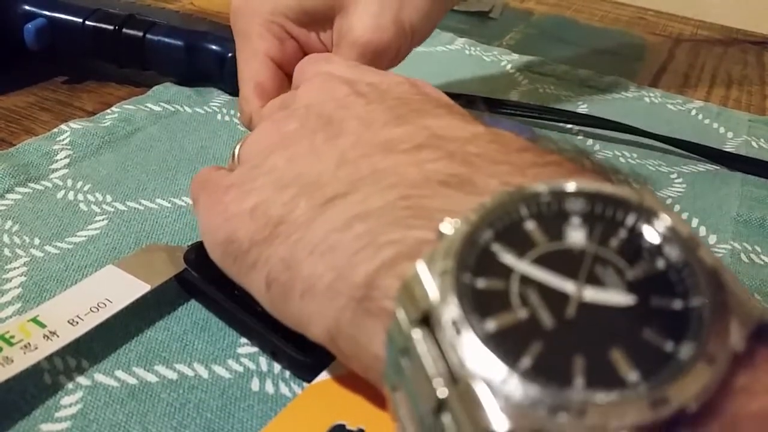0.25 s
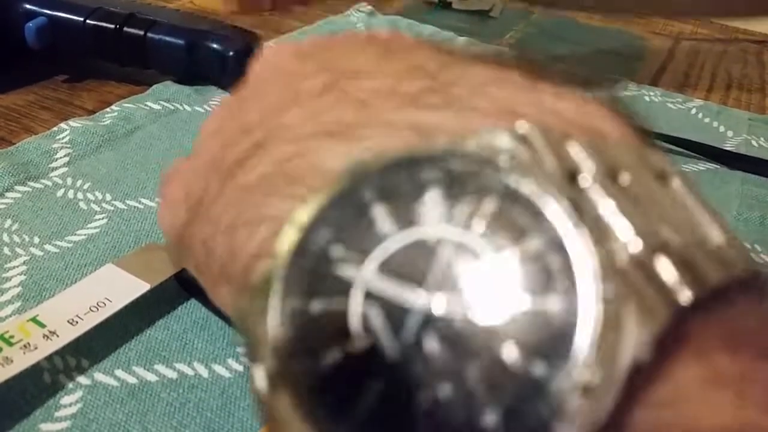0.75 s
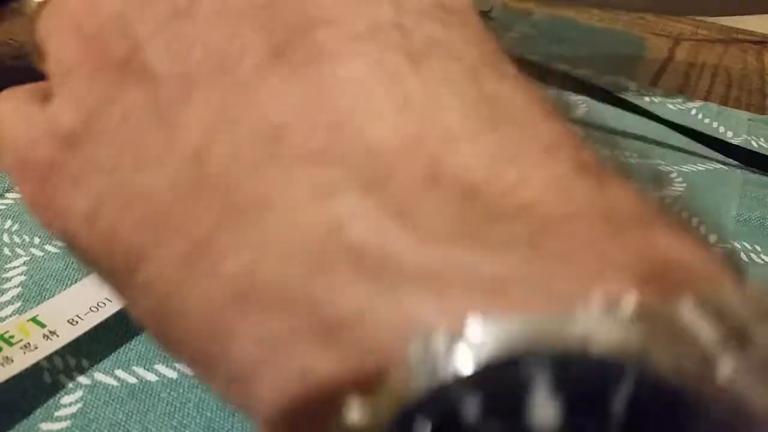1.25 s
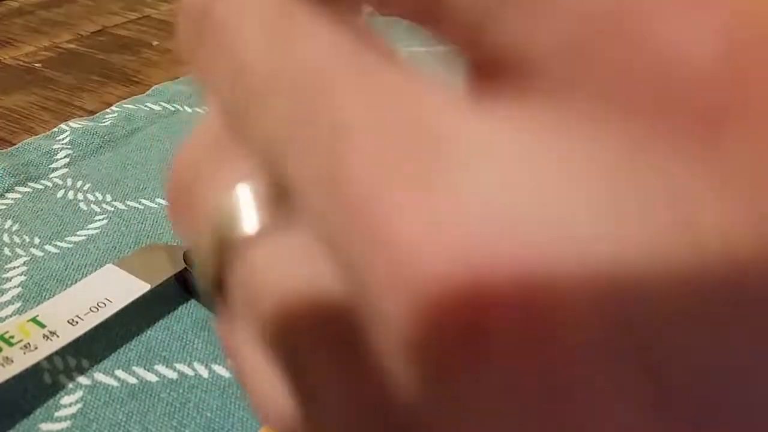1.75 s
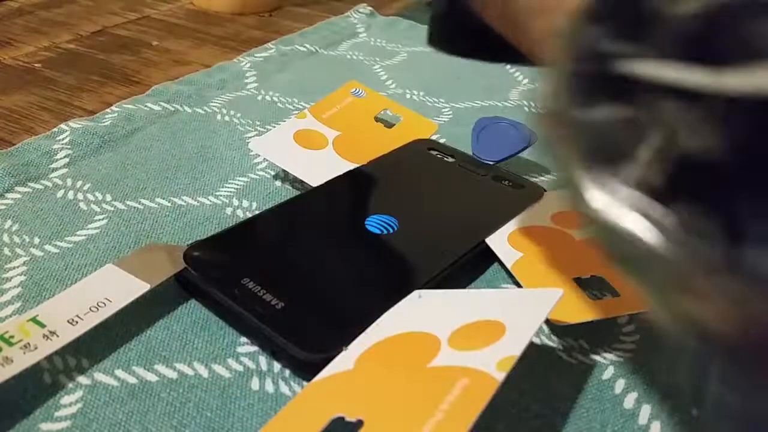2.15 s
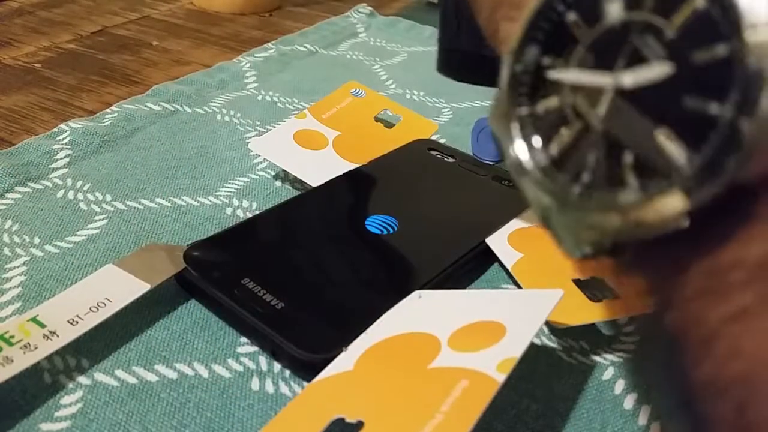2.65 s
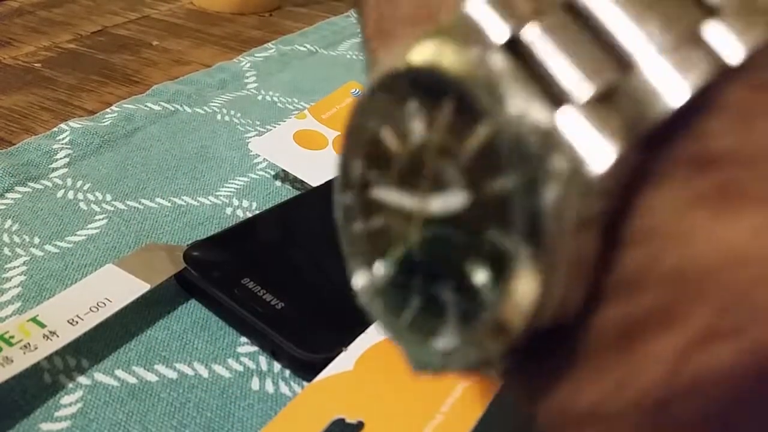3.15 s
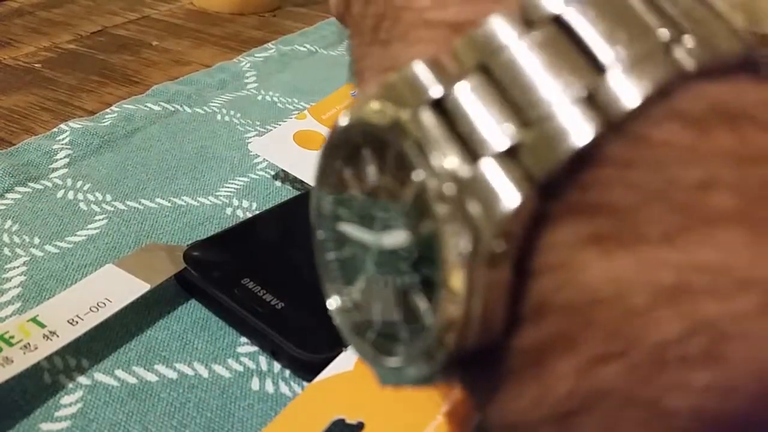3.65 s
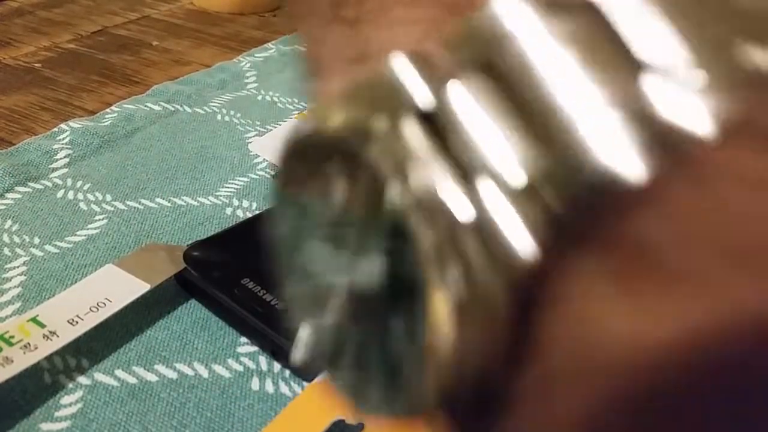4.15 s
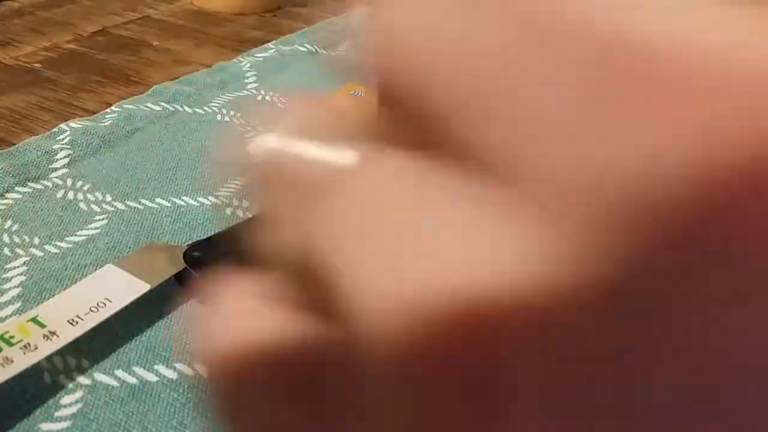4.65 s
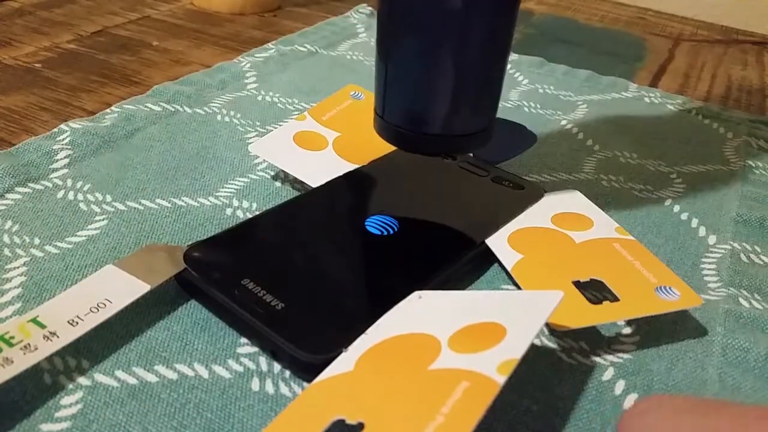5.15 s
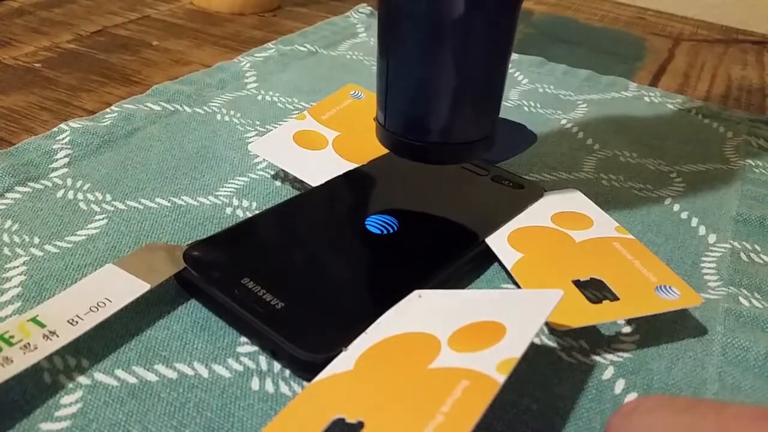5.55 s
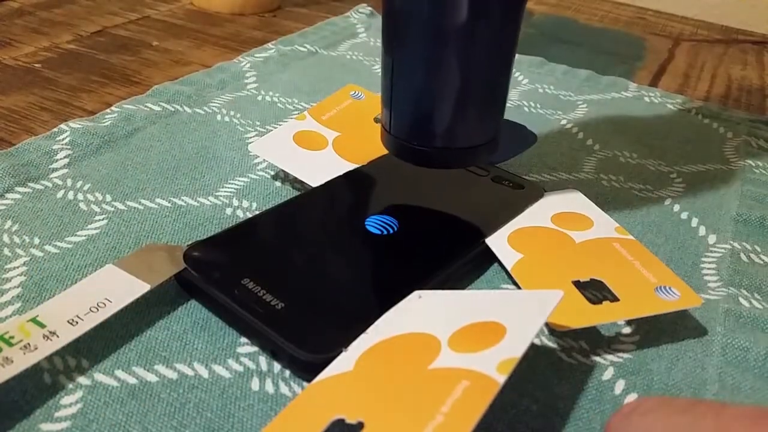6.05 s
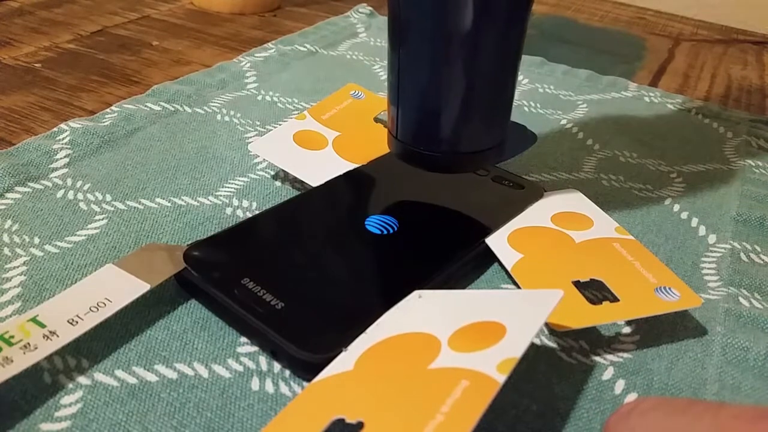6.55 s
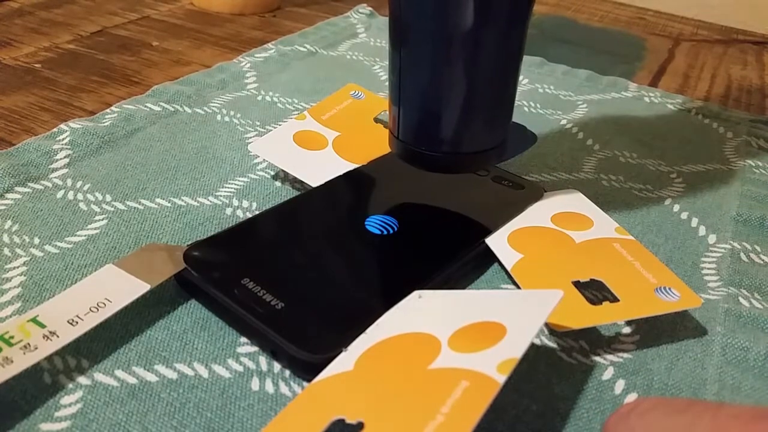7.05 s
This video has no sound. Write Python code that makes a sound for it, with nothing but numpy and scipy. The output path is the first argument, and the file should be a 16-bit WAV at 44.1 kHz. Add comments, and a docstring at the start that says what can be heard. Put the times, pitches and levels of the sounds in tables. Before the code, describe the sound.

In a quiet room with a low hum, hands and a cord brush about and plastic ticks lightly. Something is set down on a cloth-covered wooden table with two soft bumps and a sharp knock. After another dull rub, a switch clicks and a hair dryer quickly spins up close to the microphone. It keeps blowing to the end, its high whine shifting between left and right.

```python
"""A hair dryer is switched on close by: its five-blade fan spins up to a whine and slowly sags, and the
rush of air grows and brightens with its speed. The whine swells and shifts between the ears as the
dryer is moved, and the air stream makes the table boom along. Before the switch is pushed, hands and
cord brush about, plastic ticks, and something is set down on the cloth-covered wooden table with two
small bumps and a knock. A low hum and faint room noise lie under it all."""
import sys
import numpy as np
from scipy import signal
from scipy.fft import rfft, irfft
from scipy.io import wavfile
from scipy.ndimage import uniform_filter1d

SR = 44100
rng = np.random.default_rng(int(sys.argv[2]) if len(sys.argv) > 2 else 0)


def bounce(signal):
    """Save signal as a 16-bit WAV file at the path given by the first command-line argument."""
    frames = np.transpose(np.atleast_2d(signal))
    limited = np.clip(frames, -1, 1)
    pcm = np.round(limited * 32767).astype(np.int16)
    wavfile.write(sys.argv[1], SR, pcm)


N = 321489
T = np.arange(N) / SR
HZ = np.fft.rfftfreq(N, 1 / SR)
BLADES, BAND_LIMIT_HZ = 5, 15800


def dryer(on_s=2.51, spin_up_s=0.194, top_hz=1724.7, sag_hz_per_s=5.8, waver_hz=0.4, flow_rise_s=0.23):
    """The fan spins up from rest and sags; rush, table boom and motor tones ride in on the air flow."""
    running = since(on_s)
    speed = 1 - np.exp(-(running / spin_up_s) ** 1.219)  # powers above 1 soften the attack
    blade_hz = speed * (top_hz - sag_hz_per_s * running) + waver_hz * wander(rate_hz=10.2)
    shaft_angle = 2 * np.pi * np.cumsum(blade_hz) / BLADES / SR
    flow = 1 - np.exp(-(running / flow_rise_s) ** 2.3)
    flow *= amp(-0.17 - 0.16 * running)  # the dryer is slowly drawn back
    return flow * (air_rush(speed) + table_boom() + motor(shaft_angle, speed)) + whine(shaft_angle, speed)


# Whine rides as the moving dryer shifts its standing waves: t/s, level/dB, left minus right/dB
WHINE_MOVES = [(3.04, -25.5, -19), (3.23, -21, 2.5), (3.37, -26, 5), (3.64, -23.5, -4.5), (4.07, -27, 5),
               (4.18, -23.5, 4.0), (4.58, -22, -7.5), (4.93, -23.5, -7), (5.02, -22.5, -15.0),
               (5.23, -25.5, -4.5), (6.02, -22.5, -3.5), (6.52, -23.5, 0), (7.29, -24, 3)]

def whine(shaft_angle, speed, flutter=0.057, swing_rad=0.45):
    """The blade-passing tone swells with speed; reflections pan it, more so as its waves shorten."""
    level_db, pan_db = follow(WHINE_MOVES)
    pan = amp(np.array([pan_db, -pan_db]) * speed ** 3 / 2)
    lead = swing_rad * wander(rate_hz=1.0)
    shake = np.array([1 + flutter * (wander(rate_hz=22) + 1j * wander(rate_hz=39)) for _ in range(2)])
    phase = BLADES * shaft_angle + np.array([lead, -lead]) / 2
    tone = (shake * np.exp(1j * phase)).real
    return np.sqrt(2) * speed ** 5.5 * amp(level_db) * pan / pan.mean(0) * tone


# Colour of the rush: f/Hz, left density/dB, right density/dB
RUSH_COLOUR = [(25, -94, -99), (61, -79.5, -82), (293, -56, -56.5), (437, -58.5, -54.5), (533, -55.5, -56),
               (743, -48.5, -46.5), (960, -57, -48), (1300, -55, -52.5), (1595, -66, -55),
               (2120, -56.5, -56.5), (2490, -62, -52.5), (3020, -60, -56.5), (4230, -61, -59.5),
               (4930, -67, -65.5), (5450, -63, -66), (7650, -67.5, -64), (9500, -72.5, -65.5),
               (11070, -64.5, -67), (13300, -59.5, -69), (14100, -62, -64), (15700, -62, -76)]
# Stereo image of the rush: f/Hz, likeness of the ears/0-1, left lead/rad
RUSH_IMAGE = [(100, 0.81, 1.14), (550, 0.98, -0.69), (704, 0.98, -1.1), (840, 0.87, -1.5),
              (1320, 0.85, -0.98), (1630, 0.55, -1), (2210, 0.45, -1.6), (2290, 0, -3.5), (2920, 0.71, -3),
              (3330, 0.51, -2.5), (4230, 0.21, -3), (6960, 0.19, -2.5), (12000, 0.04, -3)]
# How the bands open up with fan speed: f/Hz, left exponent, right exponent
RUSH_OPENING = [(300, 0.3, 0.15), (900, 0, 0), (1400, 0.57, 0.56), (2800, 1.8, 1.15), (5000, 2.2, 0.98),
                (12000, 0, 0.053)]
# High shelf of the shading hand, slowly clearing: t/s, left gain/dB, right gain/dB
HAND_SHADE = [(2.9, -1.5, -5.5), (3.3, -0.5, -1.5), (5, -0.8, -1.2), (7.29, 0, -0.2)]

def air_rush(speed, gust_db=0.72, ripple_db=1.67, ripple_hz=35, shelf_hz=2000):
    """Turbulence in barrel and nozzle, rippled by reflections, brightened by speed, shaded by the hand."""
    ripple_bins = int(ripple_hz * N / SR) + 1
    ripple = unit_rms(uniform_filter1d(rng.standard_normal((2, len(HZ))), ripple_bins))
    air = noise(across(RUSH_COLOUR, HZ) + ripple_db * ripple, *across(RUSH_IMAGE, HZ))
    hz, frame_s, bands = signal.stft(air, SR, nperseg=512)
    at = np.minimum(frame_s * SR, N - 1).astype(int)
    opening = speed[at] ** abs(across(RUSH_OPENING, hz))[:, :, None]
    shelf = hz ** 2 / (hz ** 2 + shelf_hz ** 2)
    shade_db = follow(HAND_SHADE)[:, None, at] * shelf[:, None]
    rush = signal.istft(bands * opening * amp(shade_db), SR)[1][:, :N]
    return rush * amp(gust_db * wander(rate_hz=20))


# Motor partials: multiple of shaft speed, left level/dB, right level/dB, change over the swing/dB
MOTOR_PARTIALS = [(1, -34, -29, 0), (2, -34, -34.5, 0), (3, -38, -39.5, 0), (4, -44, -39.5, 0),
                  (6, -48, -45, 1), (10, -41, -34, -5), (15, -42, -42, -5), (20, -51, -44.5, -2),
                  (25, -58, -47, 3), (30, -45, -45.5, -2), (31, -54, -52, 2), (33, -53, -53, 1),
                  (34, -43, -55, -7), (35, -38.5, -41, -5), (36, -47, -53, 0), (37, -41, -52, -4),
                  (38, -40, -57, 5.5), (39, -43, -58, -5), (40, -39, -50, 2), (41, -49, -59, 5),
                  (43, -44, -51, -7)]

def motor(shaft_angle, speed, swing_s=4.7, swing_half_s=0.5, flutter=0.2, fade_db=2.0):
    """Shaft harmonics flutter in the turbulence and rebalance as the dryer swings over the table."""
    out = np.zeros((2, N))
    swung = (1 + np.tanh((T - swing_s) / swing_half_s)) / 2
    for order, left_db, right_db, change_db in MOTOR_PARTIALS:
        is_high = order > BLADES  # high partials come in last and drift at each ear
        shake = 1 + flutter * (wander(rate_hz=10) + 1j * wander(rate_hz=10))
        tone = np.sqrt(2) * shake * np.exp(1j * (order * shaft_angle + 2 * np.pi * rng.random()))
        lead_rad = 1.3 * wander(rate_hz=0.65) if is_high else 0.52 * order
        drift_db = is_high * fade_db * np.array([wander(rate_hz=2.5), wander(rate_hz=2.5)])
        level_db = [[left_db], [right_db]] + change_db * swung + drift_db
        gain = amp(level_db) * speed ** (7 if is_high else 0)
        out += gain * np.array([tone.real, (tone * np.exp(-1j * lead_rad)).real])
    return out


# Low modes of the table top: f/Hz, level within a knock/dB, t60/s, level under the dryer/dB
TABLE_MODES = [(44.7, -35, 1.1, -63), (118.2, -13, 0.38, -42), (184.2, -22, 0.79, -43)]

def table_boom(q=5):
    """The air stream shakes the table's low modes."""
    out = np.zeros(N)
    for hz, _, _, db in TABLE_MODES:
        resonance = 1 / (1 + (2 * q * (HZ / hz - 1)) ** 2)
        out += amp(db) * unit_rms(irfft(rfft(rng.standard_normal(N)) * resonance, N))
    return out


def table_ring(t, rise_s=0.037):
    """After a blow the same modes swell and ring on."""
    modes = sum(amp(db - 60 * t / t60) * np.sin(2 * np.pi * hz * t) for hz, db, t60, _ in TABLE_MODES)
    return (1 - np.exp(-t / rise_s)) * modes


# Two bumps and a knock: t/s, gain/dB, ring hold/s, table boom/dB, low-pass f/Hz
BLOWS = [(1.076, -20, 0.0041, -6, 390), (1.205, -16.5, 0.014, -1, 378), (1.282, -2.5, .04, 1.5, 15000)]

def knocks():
    """Each blow rings object and table and leaves a tail; a soft contact rings more briefly and sounds duller."""
    out = np.zeros((2, N))
    for s, db, hold_s, boom_db, cutoff_hz in BLOWS:
        blow = object_ring(s, hold_s) + amp(boom_db) * table_ring(since(s))
        blow += amp(boom_db / 2) * knock_tail(s)
        contact = signal.butter(2, min(cutoff_hz, BAND_LIMIT_HZ), fs=SR, output="sos")
        out += amp(db) * signal.sosfilt(contact, blow)
    return out


# Modes of the object within a knock: f/Hz, left level/dB, right level/dB, t60/s
OBJECT_MODES = [(186, -10.5, -14, 0.3), (249, -30, -28, 0.039), (358, -6.5, 2, 0.053),
                (430, -24, -25, 0.13), (479, -22, -2, 0.38), (690, -31, -6.5, 0.068), (762, -36, -20, 0.12)]

def object_ring(s, hold_s, rise_s=0.0039, release_t60=0.042):
    """The ring of the thing set down holds briefly, then dies away quickly."""
    t = since(s)
    envelope = (1 - np.exp(-t / rise_s)) * amp(-60 * since(s + hold_s) / release_t60)
    return envelope * sum(amp([[left], [right]]) * amp(-60 * t / t60) * np.sin(2 * np.pi * hz * t)
                          for hz, left, right, t60 in OBJECT_MODES)


# Low reverb and high hiss within a knock: f/Hz, density/dB, t60/s
TAIL_BANDS = [(60, -52, 0.65), (130, -53, 0.78), (260, -36, 0.35), (480, -49, 0.6), (685, -57, 0.69),
              (1000, -78, 1), (1490, -86, 1), (2800, -94, 1), (5000, -103, .35), (10000, -108, 0.25),
              (13000, -88, .3)]

def knock_tail(s, rise_s=0.0021):
    """Low reverb of a knock, plus a short, thin high hiss; every band dies at its own speed."""
    wash = noise(across(TAIL_BANDS, HZ)[0], likeness=np.exp(-HZ / 1400))
    hz, frame_s, bands = signal.stft(wash, SR, nperseg=512)
    t60 = across(TAIL_BANDS, hz)[1][:, None]
    decay = amp(-60 * np.maximum(frame_s - s, 0) / t60)
    return (1 - np.exp(-since(s) / rise_s)) * signal.istft(bands * decay, SR)[1][:, :N]


# Switch pings: t/s, right level/dB, f/Hz, t60/s
SWITCH_PINGS = [(2.518, -32.5, 762, 0.31), (2.573, -33, 720, 0.19)]

def switch(left_db=-3, rise_s=0.0013):
    """The switch pings twice as it is pushed, a little to the right."""
    out = np.zeros(N)
    for s, db, hz, t60 in SWITCH_PINGS:
        t = since(s)
        out += amp(db - 60 * t / t60) * (1 - np.exp(-t / rise_s)) * np.sin(2 * np.pi * hz * t)
    return amp([[left_db], [0]]) * out


# Brush strokes: peak t/s, gain/dB, half length/s, treble gain/dB
STROKES = [(.65, 1, 0.037, -9), (0.697, -3, .01, 0), (0.798, -1, 0.016, 1), (0.864, 2, 0.018, -1),
           (1.09, 1, 0.017, -5), (1.173, 0, .003, -8), (1.213, 7.5, 0.027, -10), (1.284, 4, 0.0022, 8),
           (1.32, 3, 0.042, -7), (1.827, 7, 0.094, -17)]
# Colour of the friction: f/Hz, density/dB
FRICTION_COLOUR = [(50, -82), (250, -83.5), (700, -85), (1100, -99), (2000, -95.5), (3800, -103),
                   (6000, -118), (10000, -122), (13000, -109), (16000, -112)]

def brushes(split_hz=1100):
    """Hands and cord brush over things: a dull rub through the table, a crisp part through the air."""
    friction = noise(across(FRICTION_COLOUR, HZ)[0], likeness=np.exp(-HZ / 900))
    dull = irfft(rfft(friction) / (1 + (HZ / split_hz) ** 4), N)
    crisp = friction - dull
    out = np.zeros((2, N))
    for s, db, half_s, treble_db in STROKES:
        swell = np.exp(-((T - s) / half_s) ** 2 / 2)
        out += amp(db) * swell * (dull + amp(treble_db) * crisp)
    return out


# Light touches: t/s, level/dB
TOUCHES = [(.693, -62), (.8, -65), (.853, -60), (0.866, -59), (1.078, -58), (1.207, -60.5), (1.274, -49),
           (1.297, -50)]
# Modes of the plastic: f/Hz, relative level/dB, t60/s
PLASTIC_MODES = [(1700, 6, .04), (2500, -1.5, .05), (3230, -3, .025), (3940, -6, .03), (5100, -14, .02)]

def ticks():
    """Each touch rings the plastic, with a phase of its own at each ear."""
    out = np.zeros((2, N))
    t = np.arange(SR // 10) / SR
    for s, db in TOUCHES:
        at = round(s * SR)
        for hz, mode_db, t60 in PLASTIC_MODES:
            tone = np.sin(2 * np.pi * (hz * t + rng.random((2, 1))))
            out[:, at:at + len(t)] += amp(db + mode_db - 60 * t / t60) * tone
    return out


# Hum partials: f/Hz, level/dB
HUM_PARTIALS = [(118.4, -60.5), (177.6, -48), (301.5, -74)]
# Colour of the noise bed: f/Hz, relative density/dB
BED_COLOUR = [(25, -24), (70, -10), (126, -12.5), (235, -14), (460, -17.5), (860, -24), (1060, -31.5),
              (1280, -17.5), (1600, -32.5), (3400, -40), (5500, -52.5), (9500, -62), (12500, -45.5),
              (15800, -44)]

def room_tone(bed_db=-56, waver_db=0.1):
    """A barely wavering low hum over a faint noise bed whose mids lean to the right."""
    hum = sum(np.sqrt(2) * amp(db) * np.sin(2 * np.pi * (hz * T + rng.random())) for hz, db in HUM_PARTIALS)
    lean_db = 5 * np.exp(-np.log((HZ + 1) / 900) ** 2 / 2)
    bed = noise(across(BED_COLOUR, HZ)[0] + np.array([-lean_db, lean_db / 2]), likeness=np.exp(-HZ / 400))
    return hum * amp(waver_db * wander(rate_hz=3.1)) + amp(bed_db) * unit_rms(bed)


def amp(db):
    """Decibels to gain."""
    return 10 ** (np.asarray(db) / 20)


def across(points, hz):
    """Every column of a table, joined by lines on a log-frequency axis."""
    f, *columns = np.transpose(points)
    return np.array([np.interp(np.log(hz + 1), np.log(f + 1), c) for c in columns])


def follow(points):
    """Every column of an automation curve at each sample."""
    s, *columns = np.transpose(points)
    return np.array([np.interp(T, s, c) for c in columns])


def unit_rms(x):
    """Scales to rms 1."""
    return x / np.sqrt(np.mean(x ** 2) + 1e-20)


def noise(db, likeness=0, lead_rad=0):
    """Stereo noise with a given density in dB per Hz, likeness of the ears and left phase lead."""
    left, other = rfft(rng.standard_normal((2, N)))
    same = np.clip(likeness, 0, 1)
    right = (same * left + np.sqrt(1 - same ** 2) * other) * np.exp(-1j * lead_rad)
    return irfft(np.array([left, right]) * amp(db), N) * np.sqrt(SR / 2)


def wander(rate_hz):
    """Smooth random modulation of rms 1, rolling off above the given rate."""
    frames = N // 64
    f = np.fft.rfftfreq(frames, 64 / SR)
    slow = irfft(rfft(rng.standard_normal(frames)) / (1 + (f / rate_hz) ** 2), frames)
    return np.interp(T, np.linspace(0, T[-1], frames), unit_rms(slow))


def since(s):
    """Time since a moment, zero before it."""
    return np.maximum(T - s, 0)


def scene():
    """The stereo mix of all sources."""
    return room_tone() + brushes() + ticks() + knocks() + switch() + dryer()


def record(dry):
    """A steep low-pass trims the very top."""
    low_pass = signal.firwin(1023, BAND_LIMIT_HZ, window=("kaiser", 9), fs=SR)
    return signal.oaconvolve(dry, low_pass[None], "same")


dry = scene()
out = record(dry)
bounce(out)
```